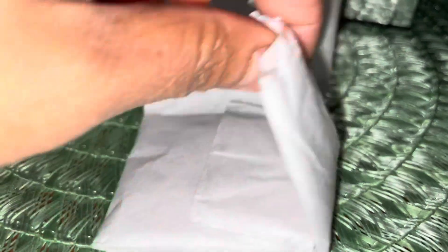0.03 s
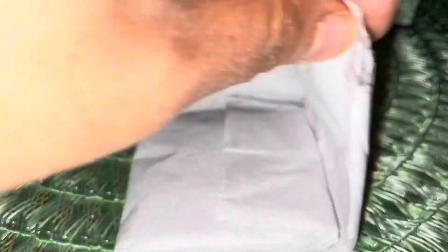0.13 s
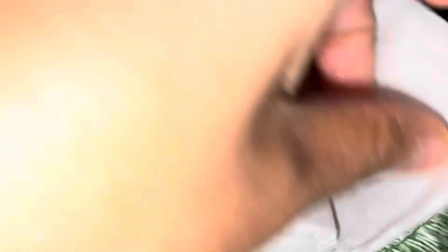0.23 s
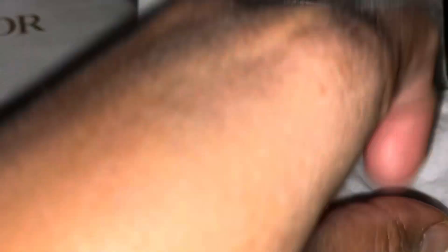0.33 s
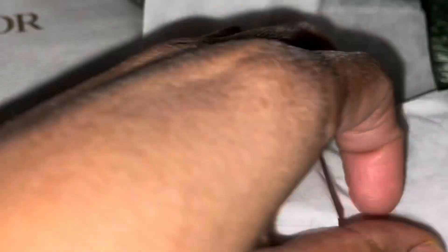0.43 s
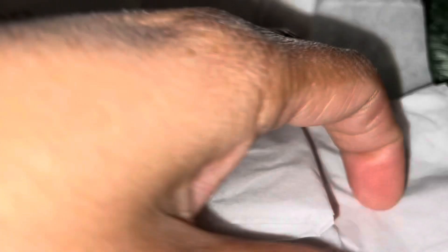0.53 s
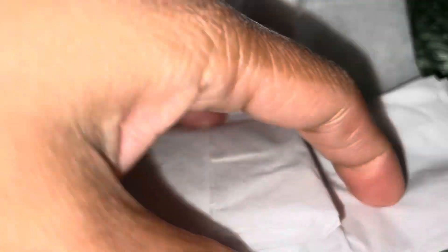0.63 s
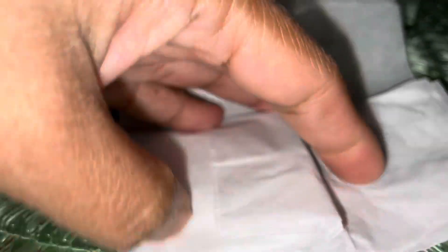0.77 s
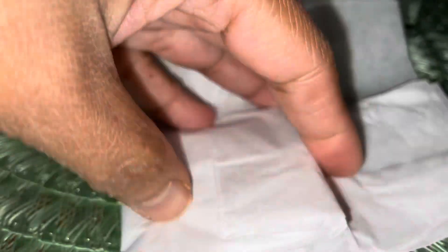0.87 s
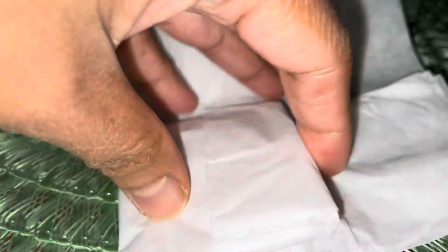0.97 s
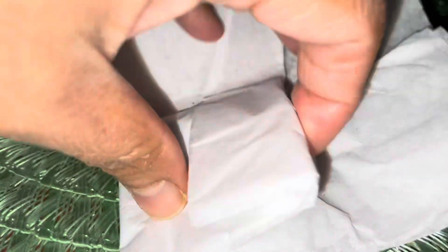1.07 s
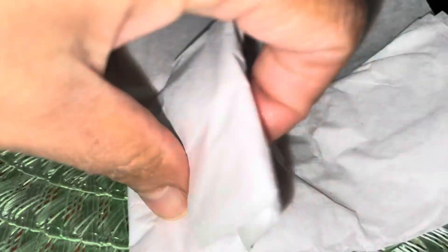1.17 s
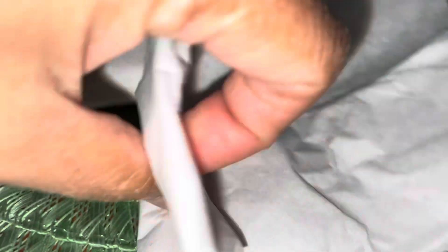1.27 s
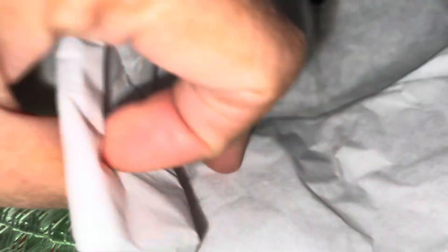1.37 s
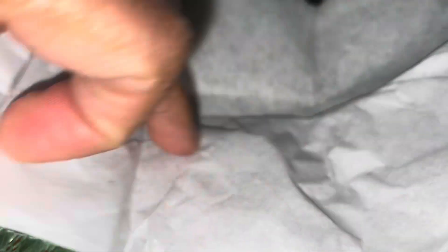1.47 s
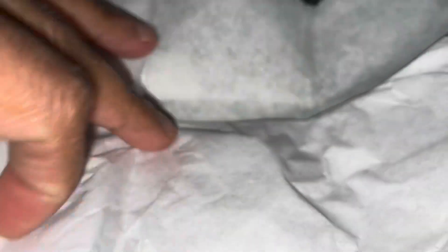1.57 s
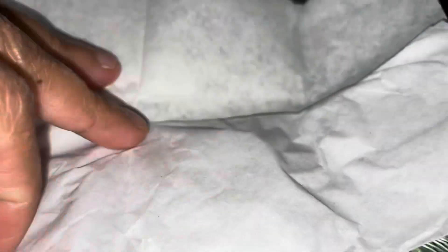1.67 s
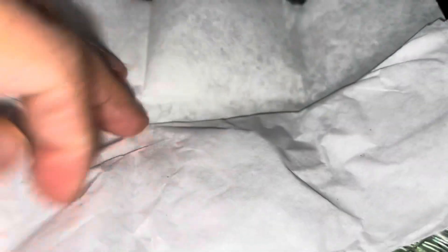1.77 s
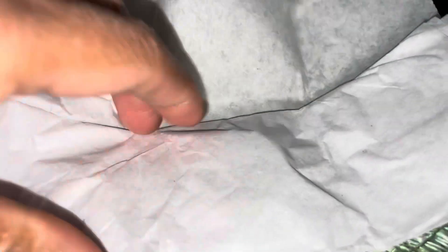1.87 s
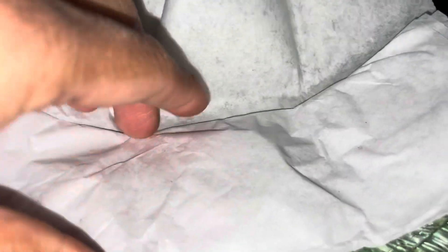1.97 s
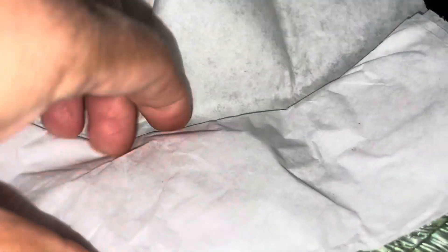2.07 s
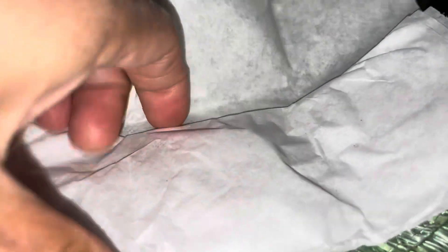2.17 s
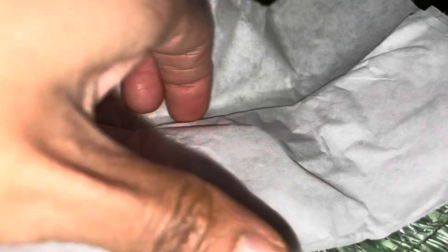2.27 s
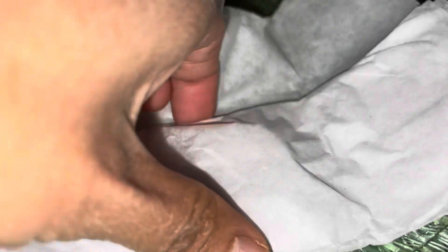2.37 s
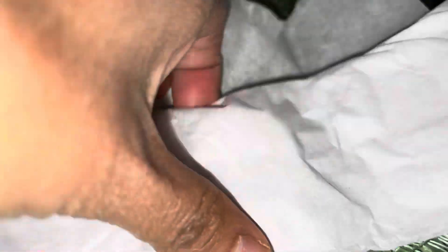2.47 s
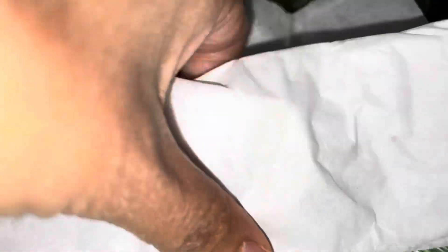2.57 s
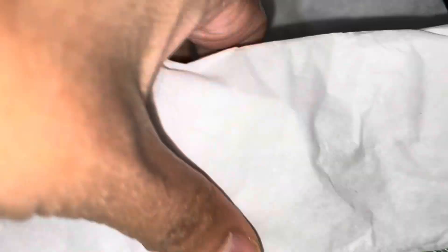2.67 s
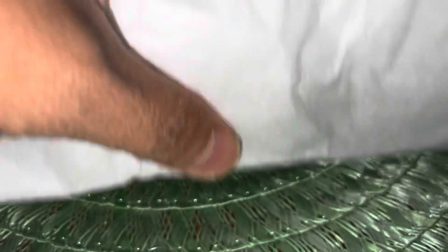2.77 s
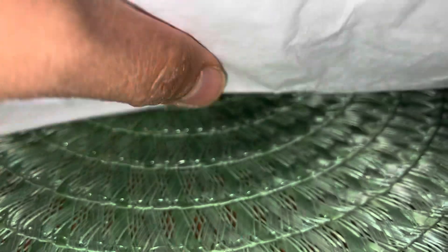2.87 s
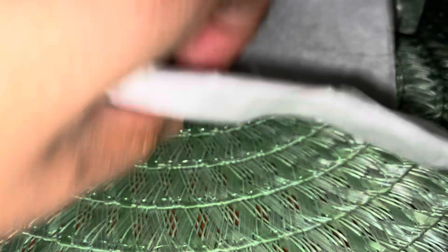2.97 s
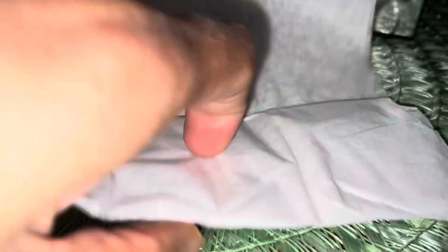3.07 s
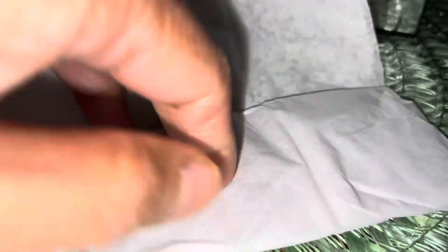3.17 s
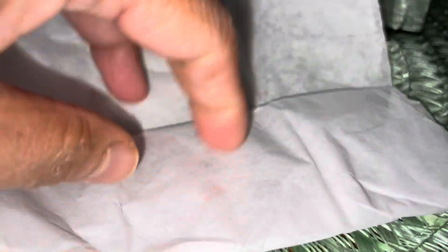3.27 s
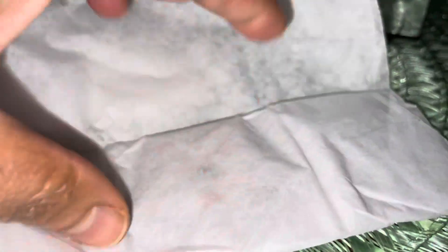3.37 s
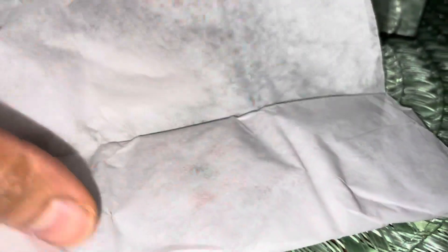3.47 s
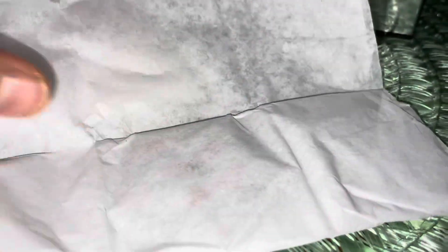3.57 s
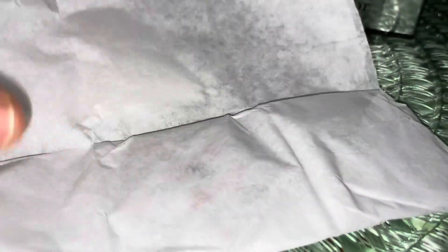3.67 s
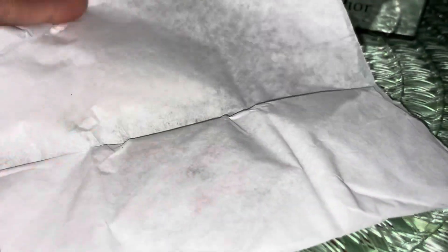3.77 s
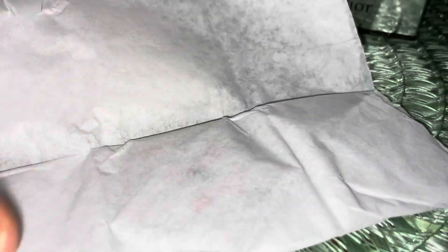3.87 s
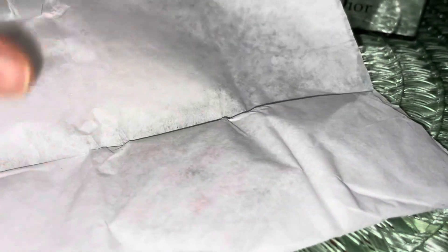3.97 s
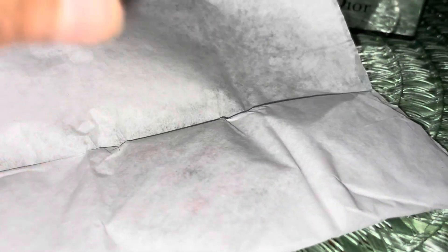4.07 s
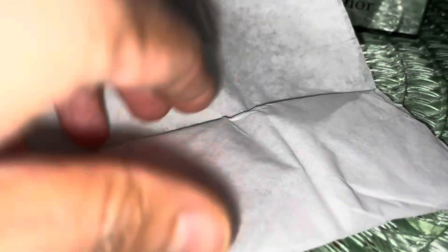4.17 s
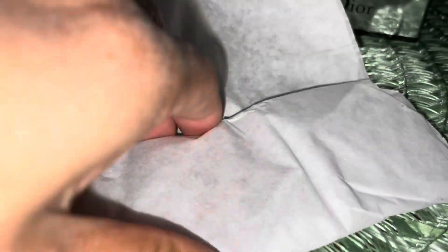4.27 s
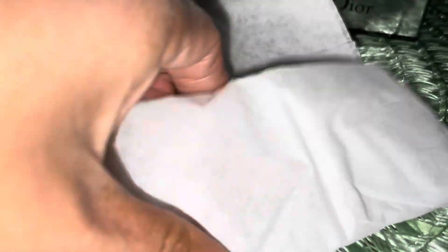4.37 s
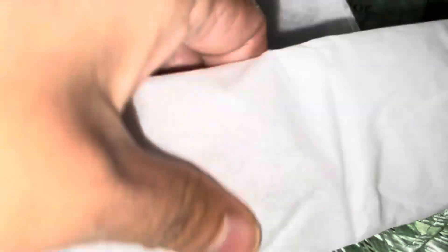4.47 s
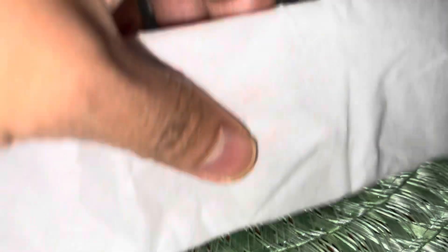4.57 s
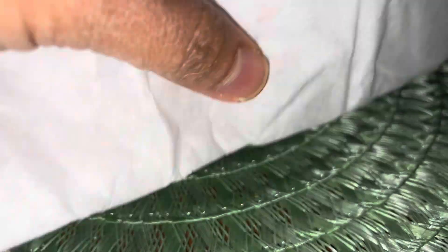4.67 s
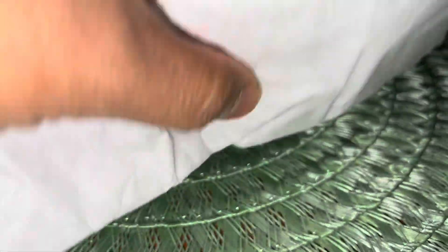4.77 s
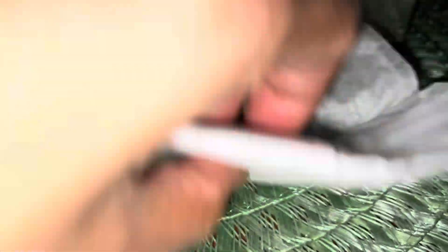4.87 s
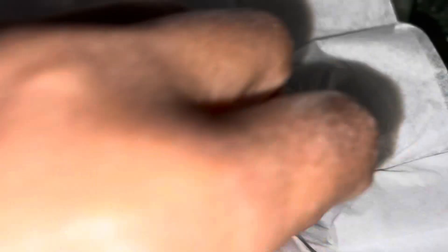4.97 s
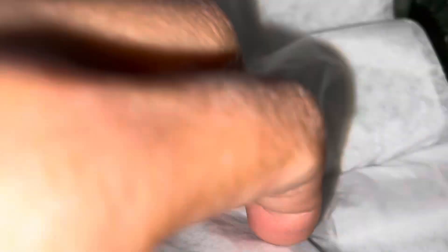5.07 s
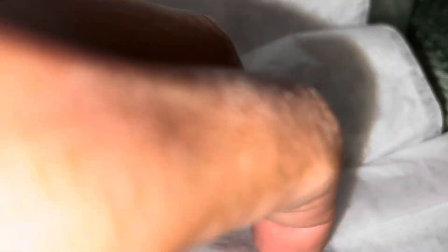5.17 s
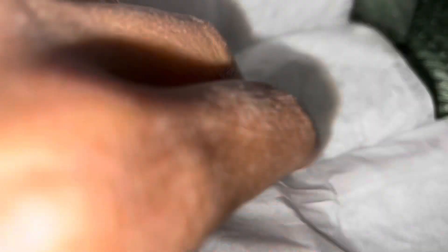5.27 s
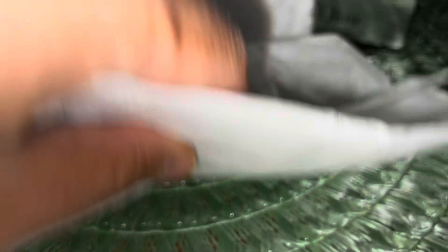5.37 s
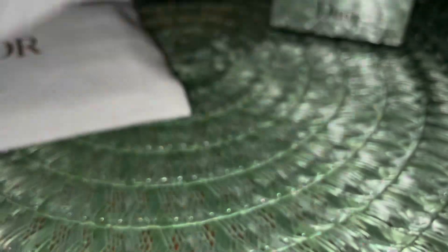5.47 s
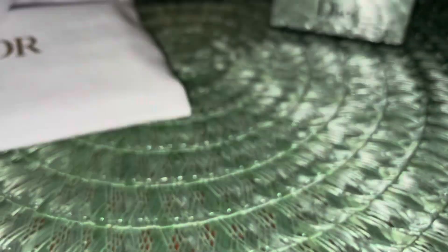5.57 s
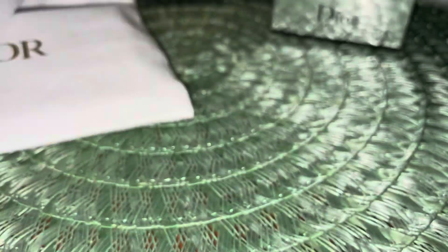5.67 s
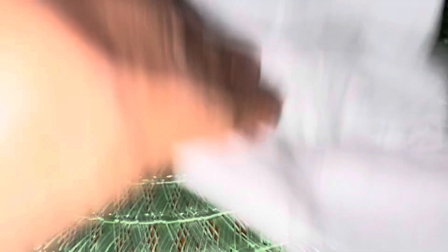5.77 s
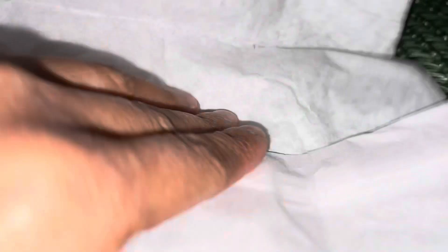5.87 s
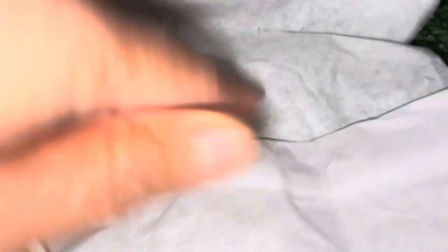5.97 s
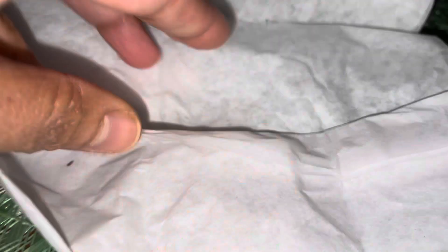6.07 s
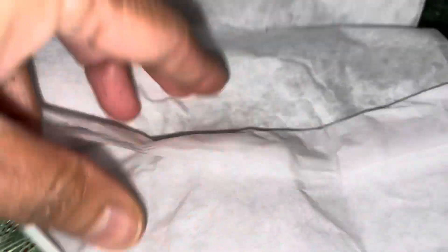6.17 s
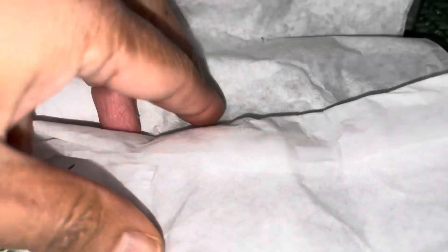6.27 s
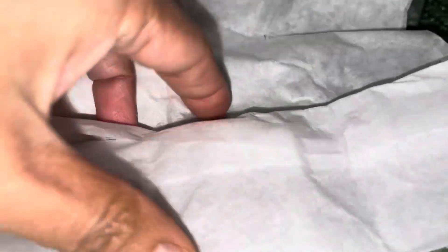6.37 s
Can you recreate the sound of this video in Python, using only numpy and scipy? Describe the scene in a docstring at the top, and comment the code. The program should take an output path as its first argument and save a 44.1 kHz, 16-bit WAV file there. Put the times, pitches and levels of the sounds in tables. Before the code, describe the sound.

Close, crisp crinkling of tissue paper being opened out by hand indoors. Fingers slide over the sheet with a dry hiss while creases tick and snap irregularly. Around the middle the paper flaps with a cluster of hollow pops and a low push of air on the nearby microphone. After a very short pause with only faint room tone, the rustling returns busier, with more snaps and a few soft thumps.

```python
"""A quiet room, a two-port microphone close to a woven mat where hands unfold thin tissue paper.
Fibres rub and tiny creases crackle; larger creases snap; whole panels buckle with a dull falling pop,
and the flapping sheet pushes air at the microphone. Just after four seconds the hands rest,
leaving the faint low rumble of the room."""
import sys
import numpy as np
from scipy import signal
from scipy.fft import rfft, irfft, next_fast_len
from scipy.io import wavfile
from scipy.ndimage import uniform_filter1d

SR = 44100
rng = np.random.default_rng(int(sys.argv[2]) if len(sys.argv) > 2 else 0)


def unload_audio(sound):
    """Save the sound as a 16-bit wav file, at the path given as the first command line argument."""
    columns = np.transpose(np.atleast_2d(sound))
    # keep every value between -1 and 1, then stretch to whole-number steps
    steps = np.round(np.clip(columns, -1, 1) * 32767)
    wavfile.write(sys.argv[1], SR, steps.astype(np.int16))


N = 282674

# Spectrum of crackling tissue, close up: frequency_hz, level_db
PAPER_SPECTRUM = [(500, -10), (1200, -2), (1750, -4), (2300, 0), (3200, -2), (4200, -1.5), (5000, -2.5),
                  (6000, 0.1), (8000, -2.5), (10000, -4), (12200, -12), (13500, -13), (15600, -8)]


def amp(db):
    """Decibels to gain."""
    return 10 ** (np.asarray(db) / 20)


def unit_rms(x):
    """Scales to rms 1."""
    return x / np.sqrt(np.mean(x ** 2) + 1e-20)


def at_hz(table, hz, column=1):
    """One column of a table, read on a log-frequency axis."""
    columns = np.transpose(table)
    return np.interp(np.log(hz + 1), np.log(columns[0] + 1), columns[column])


def at_time(table, t=None, column=1):
    """One column of a table, read at every sample unless times are given."""
    columns = np.transpose(table)
    return np.interp(np.arange(N) / SR if t is None else t, columns[0], columns[column])


def filtered(x, response):
    """Applies a complex frequency response given as a function of Hz."""
    size = next_fast_len(len(x) + 4096)
    return irfft(rfft(x, size) * response(np.fft.rfftfreq(size, 1 / SR)), size)[:len(x)]


def coloured(x, spectrum):
    """Shapes x by a spectrum table, at rms 1."""
    return unit_rms(filtered(x, lambda hz: amp(at_hz(spectrum, hz))))


def add(mix, start_s, sound):
    """Mixes a sound in at start_s."""
    part = mix[max(round(start_s * SR), 0):][:len(sound)]
    part += sound[:len(part)]


def wander(seconds):
    """Smooth random drift of rms 1."""
    width = max(round(seconds * SR), 2)
    return unit_rms(uniform_filter1d(uniform_filter1d(rng.standard_normal(N), width), width))


def grains(low_hz, high_hz, per_s, spread_db, cycles, clump_db, fall, pitches=24):
    """Clumped random trains of short wavelets that fall in pitch; a few are large."""
    out, clumps = np.zeros(N), amp(clump_db * wander(.012))
    for hz in np.geomspace(low_hz, high_hz, pitches):
        size = amp(spread_db * np.minimum(rng.exponential(1, N), 5)) * rng.choice([-1, 1], N)
        u = np.arange(0, 6 * cycles, hz / SR)  # time in cycles
        wavelet = u * np.exp(-2 * u / cycles) * np.sin(2 * np.pi * u / (1 + fall * u) ** .5)
        train = size * (rng.random(N) < per_s / pitches / SR * clumps)
        out += signal.oaconvolve(train, wavelet * hz / np.linalg.norm(wavelet) / high_hz)[:N]
    return unit_rms(out)


def swells(events, rest_db, stops=(), stop_ms=10, restart_ms=3):
    """Rows of time_s, level_db: events that rise and fall add in power, and stops hush them."""
    ms = np.arange(0, N / SR * 1000 + 20)
    power = np.zeros(len(ms))
    for peak_s, db, rise, fall in events:
        late_ms = ms - peak_s * 1000
        u = np.where(late_ms < 0, -late_ms / max(rise, 1), late_ms / max(fall, 1))
        power += amp(2 * np.maximum(db - 10 * (u + 0.066 * u ** 3), -200))  # tails fall ever faster
    for start_s, end_s, drop_db in stops:
        still = np.minimum((ms - start_s * 1000) / stop_ms, (end_s * 1000 - ms) / restart_ms)
        power *= amp(-2 * drop_db * np.clip(still + .5, 0, 1))
    return np.transpose([ms / 1000, 10 * np.log10(power + amp(2 * rest_db))])


def room_rumble():
    """Room tone: faint low noise whose level wavers."""
    # Spectrum of the room: frequency_hz, level_db
    spectrum = [(18, -48), (30, -24), (50, 1), (113, -2), (258, -7), (322, -9.5), (351, -3), (781, -47.5),
                (1660, -62), (6000, -67), (7800, -99), (13200, -120)]
    # Its slow swell: time_s, level_db
    levels = [(0, -44), (1.4, -45), (2.5, -39.5), (4.1, -38), (5.3, -35.5), (6.41, -43)]
    noise = rng.standard_normal(N) * amp(2.4 * wander(0.074))
    return amp(at_time(levels)) * coloured(noise, spectrum)


def finger_rubbing():
    """How hard the fingers rub the sheet, as rows of time_s, level_db."""
    # Pulls of the fingers: peak_s, level_db, rise_ms, fall_ms (each over about the top 10 dB)
    strokes = [(.01, -45.5, 23, 57), (.10, -39.5, 51, 90), (.30, -28, 60, 61), (.34, -26.5, 38, 53.5),
               (.428, -24.5, 47, 69), (.51, -33.5, 60, 38), (.60, -38, 148, 215), (.78, -29, 70, 180),
               (1.0, -32.5, 27, 150), (1.085, -30, 22, 19), (1.115, -39, 12, 30), (1.153, -26, 43, 13),
               (1.19, -41, 27, 43), (1.32, -31, 163, 132), (1.49, -28.5, 28, 208), (1.63, -30.5, 160, 78),
               (1.81, -24.5, 44.5, 154), (2.05, -27, 42, 14), (2.10, -25, 36, 156), (2.31, -28, 57.5, 11),
               (2.40, -28, 61, 25), (2.50, -27.5, 101, 69), (2.597, -22, 68, 20), (2.63, -26.5, 24.5, 23.5),
               (2.70, -27.5, 75.5, 92), (2.77, -25.5, 83, 31), (2.87, -31, 50, 52), (2.945, -27, 55, 34),
               (3.02, -16, 24, 25), (3.048, -21.5, 17, 10), (3.12, -24.5, 118, 100), (3.27, -38, 4, 43),
               (3.37, -27, 26, 33), (3.46, -28, 12.5, 4), (3.56, -35.5, 93, 86), (3.62, -25, 32, 33),
               (3.76, -21, 71, 41), (3.82, -29, 30, 57), (3.92, -48, 30, 4), (3.95, -50, 60, 88),
               (4.012, -37, 11, 7.5), (4.21, -17, 11, 64), (4.33, -22.5, 26, 47), (4.405, -22, 64, 20),
               (4.45, -26.5, 32, 41), (4.51, -21.5, 47, 46), (4.57, -20.5, 49, 29), (4.66, -22.5, 88.5, 16),
               (4.70, -21, 27, 34.5), (4.77, -24.5, 37, 46), (4.825, -23, 25, 51.5), (4.91, -22.5, 32, 105),
               (5.0, -28.5, 204, 114), (5.11, -21.5, 72, 57.5), (5.23, -31.5, 29, 150),
               (5.285, -25, 46.5, 34), (5.362, -22, 43, 35), (5.43, -32, 40, 29.5), (5.50, -31.5, 145, 85),
               (5.66, -35, 204, 50), (5.74, -22, 14.5, 15.5), (5.83, -20, 42.5, 135), (6.09, -35.5, 98, 32),
               (6.225, -17.5, 24.5, 32), (6.33, -30, 104, 125), (6.40, -32.5, 60, 52)]
    # The hands stop and still the sheet: start_s, end_s, drop_db
    stops = [(1.215, 1.24, 4.5), (2.325, 2.352, 3.5), (3.932, 3.938, 8), (3.968, 3.981, 10),
             (3.992, 4.001, 12), (4.068, 4.203, 22), (4.85, 4.885, 1.5), (5.17, 5.21, 4), (6.12, 6.168, 0)]
    return swells(strokes, rest_db=-70, stops=stops)


def rustle(rubbing):
    """Sliding fibres hiss in gusts under tiny crackling creases; grip and hand shape move the colour."""
    # Resonance of the hollow between hand and sheet: time_s, centre_hz, lift_db
    hollow = [(0, 5270, 0.5), (.3, 2000, 2.5), (.5, 1890, 1.5), (.8, 3400, 3), (1.1, 3880, 2),
              (1.3, 3500, 2.5), (1.6, 4370, 3), (1.85, 3800, 2.5), (2.2, 4840, 1), (2.7, 3860, -2),
              (3.05, 4300, 1), (3.45, 3470, 2), (3.75, 4650, 0.5), (4.4, 5130, 2.5), (5.1, 3040, 5),
              (5.35, 3140, 5), (5.75, 4100, 2.5), (6.41, 4150, 1.5)]
    # An echo off the near hand cancels one band: time_s, centre_hz, depth_db, width_octaves
    echo = [(0, 3400, 4, 0.31), (.3, 3400, 11, 0.22), (.45, 3280, 18, 0.17), (.65, 3200, 4, 0.48),
            (.8, 6000, 4, 0.18), (1.0, 1760, -1, .2), (1.55, 1600, 9, 0.16), (2.0, 1680, 2, 0.14),
            (3.1, 1870, -2, 0.18), (3.3, 1720, 19, 0.23), (4.0, 1620, -2, .15), (4.4, 3920, 5.5, 0.3),
            (5.3, 5200, 3.5, 0.65), (5.55, 1790, 7, 0.19), (6.41, 1800, 0, .15)]
    hiss = rng.standard_normal(N) * amp(2.0 * wander(0.0063) + 2.9 * wander(0.00074))
    crackle = grains(1216, 15500, per_s=3000, spread_db=2.0, cycles=0.98, clump_db=4.0, fall=0.0092)
    # Stiffer facets ring for a few cycles.
    ticks = grains(1048, 9000, per_s=900, spread_db=2.5, cycles=2.4, clump_db=4.5, fall=0.007, pitches=12)
    paper = coloured(0.58 * unit_rms(hiss) + 0.61 * crackle + 0.3 * ticks, PAPER_SPECTRUM)
    hz, t, frames = signal.stft(paper, SR, nperseg=256)
    octaves = np.log2(np.clip(hz, 1200, None))[:, None]

    def band_db(table, width_octaves):
        offset = octaves - np.log2(at_time(table, t))
        return at_time(table, t, column=2) * np.exp(-(offset / width_octaves) ** 2)

    db_per_octave = -0.99 + 0.066 * (at_time(rubbing, t) + 30)  # gentler rubbing is duller
    tilt_db = (octaves - np.log2(5000)) * db_per_octave
    hollow_db = band_db(hollow, width_octaves=0.46)
    echo_db = -band_db(echo, np.maximum(at_time(echo, t, column=3), .05))
    # Different folds sound at different moments.
    folds = uniform_filter1d(uniform_filter1d(rng.standard_normal(frames.T.shape), 24, 0), 8, 1).T
    frames *= amp(tilt_db + hollow_db + echo_db + 2.28 * unit_rms(folds))
    return amp(at_time(rubbing) + 2.5) * signal.istft(frames, SR, nperseg=256)[1][:N]


def random_creases(rubbing, count=220, over_rubbing_db=13):
    """Rows for crease_snaps: further creases give way at random times, as loud as the rubbing allows."""
    when, extra_db, tilt, length = rng.random((count, 4)).T
    start_s = when * N / SR
    level_db = at_time(rubbing, start_s) + over_rubbing_db + extra_db
    return list(zip(start_s, level_db, 2.5 + 14.0 * (tilt - .5), 0.21 * (.5 + length)))


def crease_snaps(rubbing, ring_hz=4900, ring_octaves=0.14):
    """A crease lets go in a burst of a few milliseconds and rings briefly, higher when brighter."""
    # Creases at set times: start_s, level_db, tilt_db_per_octave, length_ms
    set_creases = [(0.012, -14.5, 3, 0.57), (0.0205, -13.5, 2, 0.37), (0.175, -13, 7, 0.41),
                   (0.1947, -18, 4, 0.87), (0.26, -14.5, 15, 1.5), (0.323, -9.5, -16, 0.73),
                   (0.351, -21, 0, 0.65), (0.3665, -22, 3, 0.44), (0.376, -28, -5, .6),
                   (0.404, -14, -2, 0.88), (0.425, -7.5, 2, 2.2), (0.441, -17, -13, 0.88),
                   (0.478, -12, -12, 0.46), (0.541, -21, 9, .5), (0.549, -19.5, -4, 0.5),
                   (0.604, -11, 16, 0.5), (0.629, -22, -3, .5), (0.7667, -10, 9, 0.43),
                   (0.7748, -7, 0, .8), (0.782, -9, 2, 0.56), (0.7931, -3, 6.5, 0.41),
                   (0.821, -22, 0, 0.94), (0.834, -17, 12, .5), (0.854, -19, 7, 0.55),
                   (0.873, -19, 13, .6), (0.987, -11.5, 9, 0.58), (1.0621, -4, 9, 0.51),
                   (1.109, -15, 4, 1.5), (1.116, -12.5, -1.5, 0.77), (1.178, -16, 8, .5),
                   (1.187, -11, 3, 0.91), (1.197, -10, 2, 0.53), (1.206, -10, 1.5, 0.76),
                   (1.2155, -14, 2, .5), (1.226, -15, 6, 0.37), (1.233, -22, -6, .4),
                   (1.2467, -10, 6, 2.2), (1.2552, -9, 6, 0.51), (1.277, -15.5, -2, 1.1),
                   (1.307, -15, -14, 0.89), (1.359, -32, -1, 0.54), (1.3772, -11, 1, .4),
                   (1.441, -11, -3, 0.16), (1.484, -15, -6, 1), (1.4922, -9, -1, 0.89),
                   (1.534, -21, 0, 0.45), (1.619, -10, -3, 0.89), (1.6654, -7, 10, 1.1),
                   (1.7288, -11.5, 7, 0.93), (1.825, -14, -8, 0.51), (1.8558, -7, -6, .5),
                   (1.886, -8, -10, 0.4), (1.8987, -11, -7, 0.48), (1.9155, -25, 7, 0.64),
                   (1.934, -13.5, -17, 0.39), (1.984, -7.5, -2, 0.62), (2.028, -17, -6, .6),
                   (2.0459, -4.5, 2, 1.6), (2.074, -12, 8, 0.54), (2.108, -5.5, 0, .7),
                   (2.154, -27, 2, 0.51), (2.1855, -13, 5, 0.67), (2.2313, -6, 5, 0.59),
                   (2.3166, -8.5, -0.5, 1.4), (2.337, -13, -5, 0.65), (2.356, -10.5, -2.5, 2.7),
                   (2.399, 2.5, 7, 0.34), (2.4068, -1, 8, 0.24), (2.414, -15, 26, .6),
                   (2.439, -9, 0.5, 0.89), (2.479, -9, 10, .5), (2.502, -11, 4, 1.2),
                   (2.537, -10, 12, 1.4), (2.554, -10, -4, 0.82), (2.5193, -6.5, 1, 2.4),
                   (2.833, -10, 5, 0.69), (2.8584, -10, 6, 0.54), (2.852, -10, 12, 0.55),
                   (2.8768, -10, 9, 0.63), (2.882, -8, 8, 0.53), (2.936, -23, -1, .6), (2.98, -15, 7, .6),
                   (3.015, -3, 21, 1.6), (3.024, -15, -14, 1.3), (3.2727, -12, 6, 0.55),
                   (3.3, -15, 2, 1.2), (3.4565, -8.5, 10, 0.87), (3.529, -14, 0.5, 0.6),
                   (3.5522, -15, -3, 0.37), (3.5588, -13, 2, 0.86), (3.596, -13, 4, 0.95),
                   (3.6205, 0.5, 2.5, 0.41), (3.624, -11, 1, .6), (3.679, -12, -1, 2),
                   (3.724, -5, -2, 0.76), (3.7609, 4, 0.5, 0.65), (3.781, -8, -10, 1.2),
                   (3.825, -10, 1, 0.79), (3.8461, -13, -2, 0.79), (3.879, -12.5, 2, 1.5),
                   (3.9132, -17, 5, .7), (3.919, -23, -4, 0.66), (3.94, -13, 4, 0.67),
                   (3.947, -21, -7, 1.4), (3.956, -21, 4, .6), (3.9617, -32, -5.5, .7),
                   (3.9825, -12, 1, 0.37), (4.01, -24, 3, 0.46), (4.03, -21, 0.5, 0.46),
                   (4.033, -22, 3, 1.5), (4.0471, -29.5, -4, 1.5), (4.1626, -33.5, -12, 1),
                   (4.213, -22, -2, 8), (4.236, -4, 1, 0.85), (4.309, -3.5, 2, 0.68),
                   (4.303, -10, 2, 0.66), (4.324, -6, 2, 0.67), (4.3282, -6, -1, 1.3),
                   (4.371, 1, 5.5, 0.43), (4.387, -0.5, 10, .6), (4.4544, -4, 11, 0.87),
                   (4.49, -10, 6, 0.65), (4.516, -11, 10, 0.58), (4.523, -14, -10, 3),
                   (4.563, -2, 4, 0.95), (4.5715, -4, -4, 0.45), (4.6276, -6.5, -3, 0.33),
                   (4.65, 7, 12, 0.31), (4.658, -2, 6.5, 0.65), (4.749, -9, 5, 0.72),
                   (4.761, -10, -2, 1.2), (4.778, -9, 6, .6), (4.796, -3, 2, 0.93), (4.821, -9, 1, 1.3),
                   (4.85, -3.5, 0.5, 1.1), (4.8996, -6.5, -7, 1.2), (4.906, -19, 4, 0.62),
                   (4.977, -7, -21, 0.53), (5.0232, -12, -2, .5), (5.12, -9, -24, 1.7),
                   (5.248, -19, 0, 0.37), (5.276, -22, 5, 3), (5.294, -11, -9, 0.51),
                   (5.3262, -6.5, 13, 0.5), (5.381, -3, 14, 0.63), (5.399, -15, 7, .6),
                   (5.409, -11, 6, 0.45), (5.429, -10.5, 7, 0.88), (5.458, -7, -1, 0.92),
                   (5.4758, -5, 0, 1.2), (5.515, -4.5, 1, 0.52), (5.526, -3.5, 2, 0.48),
                   (5.538, -9.5, -2, 0.63), (5.593, -29, 7, .5), (5.64, -14, 3, 0.54),
                   (5.664, -25, 7, .4), (5.673, -14.5, 3, 1.3), (5.725, -6, 8, 1.2),
                   (5.741, -6.5, -0.5, 2), (5.8186, -1, 5, 4.2), (5.8586, -8.5, -16, 0.53),
                   (6.069, -21, 4, 0.55), (6.081, -18, -12, 0.77), (6.102, -12.5, -3.5, 0.8),
                   (6.1715, -13, -0.5, 1.4), (6.184, -7, 3, 0.31), (6.2195, -13, 0, 0.67),
                   (6.2342, -15, -23, 1.5), (6.306, -13, -3, .6), (6.314, -14, 0, 0.5),
                   (6.335, -11, -8, 0.76), (6.3637, -4, -3, 0.61), (6.3858, -4.5, 2, 0.56),
                   (6.4065, -5, -1, 1.8)]
    out, ms = np.zeros(N), np.arange(1024) / SR * 1000
    hz = np.fft.rfftfreq(1024, 1 / SR)
    octaves = np.log2(np.clip(hz, 2200, 11000) / 5000)
    for start_s, level_db, tilt, length_ms in random_creases(rubbing) + set_creases:
        off_ring = np.log2(hz / ring_hz + 1e-9) - 0.027 * tilt
        ring_db = 5 * np.exp(-(off_ring / ring_octaves) ** 2)
        colour = amp(ring_db + at_hz(PAPER_SPECTRUM, hz) + tilt * octaves)
        noise = irfft(rfft(rng.standard_normal(1024)) * colour)
        u = ms / max(length_ms, .2)
        burst = noise * (1 - np.exp(-u / 0.15)) * np.exp(-u / 1.8)
        add(out, start_s - .0004, amp(level_db - 2.0) * burst / abs(burst).max())
    return out


def panel_pops():
    """Bending waves in paper carry the high pitches first, so each buckling panel falls in pitch."""
    # Panels flipping their curve: start_s, level_db, final_pitch_hz, extra_onset_cycles
    flips = [(0.135, -27, 95, .1), (0.343, -25, 266, 3.2), (0.4292, -8.5, 1190, 0.44),
             (0.478, -15, 900, 1.1), (0.699, -22.5, 590, 0.57), (0.7729, -9.5, 1430, 0.67),
             (1.247, -15, 1050, 0.78), (1.486, -20, 700, .4), (1.492, -17.5, 391, 0.87),
             (1.4985, -14.5, 800, 0.34), (1.524, -25, 500, 0.34), (1.534, -20, 700, .4),
             (1.552, -22, 450, 0.33), (1.5784, -24, 453, 0.51), (1.5896, -14, 553, .4),
             (1.594, -21, 96, 0.33), (1.601, -15, 800, .3), (1.61, -18.5, 700, .3),
             (1.6319, -13, 118, 1.48), (2.048, -16.5, 424, 1.07), (2.2003, -13.5, 446, 2.7),
             (2.5354, -12.5, 790, 1.1), (2.6033, -20, 273, 1.5), (3.014, -9, 980, 0.18),
             (3.036, -7.5, 104.5, 1.13), (3.0173, -8.5, 1010, 0.29), (3.052, -10.5, 1100, .2),
             (3.0714, 1, 1150, .02), (3.074, -13, 700, 0.22), (3.078, -11, 1150, 0.24),
             (3.0845, -5, 198, 0.68), (3.093, -23, 700, .3), (3.102, -6.5, 753, 0.24),
             (3.1045, -17, 420, .2), (3.109, -25, 500, 0.33), (3.0999, -3, 363, 0.25),
             (3.130, -7.5, 230, 0.64), (3.144, -19, 75, 0.23), (3.733, -15.5, 111, 0.22),
             (3.76, -14, 355, 0.89), (3.77, -20, 445, 0.24), (4.2128, -10, 465, 0.69),
             (4.2215, -11, 700, .4), (4.2252, -10, 457, 0.58), (4.3325, -18, 396, 1.9),
             (4.388, -10.5, 1100, 1.5), (4.4662, -11, 900, 1.6), (4.5212, -12, 370, 0.48),
             (4.555, -15.5, 580, 0.42), (4.705, -13, 84, 0.85), (4.7962, -14, 777, 0.54),
             (4.8228, -14.5, 416, 0.92), (4.8343, -11, 1010, 0.51), (4.939, -16, 330, 1.8),
             (5.0136, -9, 505, 1.4), (5.0231, 1, 331, 2.17), (5.0345, -5.5, 330, .1),
             (5.0554, -15, 348, 0.26), (5.0603, 2, 337, 1.6), (5.1107, -18, 497, 1.6),
             (5.3578, -12, 577, 1.1), (5.48, -13, 77, .2), (5.8172, -3.5, 167, 1.21),
             (5.828, -16, 69.5, 0.32), (5.844, -5, 267, 1.58), (5.8425, -11, 820, .2),
             (5.8525, -2, 560, .3), (5.8578, -2, 760, .3), (5.8605, -15, 420, .3), (5.8716, -6, 310, 0.098),
             (5.8778, -10, 800, .5), (5.888, -12, 700, .3), (5.908, -17, 1000, .3),
             (5.992, -16.5, 62, 0.26), (6.229, -27, 450, 0.49)]
    out = np.zeros(N)
    for start_s, level_db, pitch_hz, extra_cycles in flips:
        u = np.arange(0, 8, pitch_hz / SR)  # time in cycles of the final pitch
        turns = u + extra_cycles * (1 - np.exp(-u / 0.29))
        envelope = (1 - np.exp(-(u / 0.18) ** 2)) * np.exp(-u / 1.29)
        add(out, start_s - .0004, amp(level_db) * envelope * np.sin(2 * np.pi * turns))
    return out


def sheet_flaps(rubbing, rise_share=0.43, flex_slower=2.03):
    """The sheet flexes with small flips and a low rub, and pushes air; panels settle slower than air."""
    # Flaps of the whole sheet: peak_s, air_db, flex_db, air_fall_ms (over about the top 10 dB)
    flaps = [(0.14, -31.5, -41.5, 11), (.34, -30.5, -30, 17), (.435, -67, -39.5, 40), (.82, -43, -67, 45),
             (1.36, -40, -47, 48), (1.50, -29.5, -36, 31), (1.58, -31.5, -39, 36),
             (1.638, -32.5, -32.5, 35), (1.84, -38, -34.5, 140), (2.05, -34, -33.5, 19),
             (2.19, -38.5, -33, 137), (2.45, -38, -36.5, 62), (2.55, -54, -33, 50),
             (2.618, -27.5, -35.5, 24), (2.77, -50, -56, 30), (2.84, -38.5, -39, 104), (3.04, -19, -21, 36),
             (3.10, -23, -28, 54), (3.43, -32, -46, 51), (3.56, -33, -37, 51), (3.66, -30.5, -37, 57),
             (3.73, -25.5, -30.5, 97), (3.87, -44, -53.5, 43), (4.226, -18.5, -18, 7.5),
             (4.37, -37, -53, 67), (4.53, -29, -38.5, 86), (4.71, -26, -33, 60), (4.91, -28.5, -29, 75),
             (5.14, -33, -30, 31), (5.07, -33, -26.5, 49), (5.30, -34, -33.5, 66), (5.48, -29, -30, 42),
             (5.843, -18.5, -18.5, 29), (5.951, -31, -28.5, 38), (5.998, -42, -49, 36),
             (6.191, -40, -36, 16), (6.30, -34.5, -35, 52), (6.388, -36, -31, 34)]
    # Spectrum of the flexing panels: frequency_hz, level_db
    flex_spectrum = [(120, -15), (250, 9), (400, 4), (800, 3), (1300, -1.5), (1800, -22), (3000, -46)]
    # Spectrum of air pushed at the microphone: frequency_hz, level_db
    air_spectrum = [(20, -46), (42, -6.5), (70, 7), (120, 3.5), (200, -4), (350, -21)]
    flips = grains(177, 1503, per_s=500, spread_db=1.5, cycles=1.63, clump_db=5.0, fall=0.083, pitches=12)
    flex = coloured(0.36 * flips + 0.86 * rng.standard_normal(N), flex_spectrum)
    air = coloured(rng.standard_normal(N) * amp(1.6 * wander(0.024)), air_spectrum)
    pushes = [(s, db, rise_share * ms, ms) for s, db, _, ms in flaps]
    bends = [(s, db, rise_share * flex_slower * ms, flex_slower * ms) for s, _, db, ms in flaps]
    push_db = at_time(swells(pushes, rest_db=-70)) + 2.9
    bend_db = at_time(swells(bends, rest_db=-58)) + 1.0
    rub_db = at_time(rubbing)  # both also follow the rubbing
    flex_gain = np.hypot(amp(bend_db), amp(rub_db - 8))
    air_gain = np.hypot(amp(push_db), amp(rub_db - 12.5))
    return flex * flex_gain + air * air_gain


def scattered(x):
    """The same sound by ever-changing paths off moving hands and folds: random phases in short frames."""
    frames = signal.stft(x, nperseg=128)[2]
    phases = np.exp(2j * np.pi * rng.random(frames.T.shape).T)
    return unit_rms(signal.istft(frames * phases, nperseg=128)[1][:N]) * np.std(x)


def right_port(left):
    """The right port hears the paper shaded, shifted in phase and partly by other paths."""
    # Left port against right: frequency_hz, left_louder_db, left_lead_rad, coherence (0-1)
    ports = [(60, 1.2, .2, .95), (350, 4.9, .5, .94), (1200, 8.5, .85, .87), (1800, 6, .1, .35),
             (2900, 2.5, .1, .45), (4300, 2.8, .1, .85), (5900, 7.5, -.3, .8), (6350, 8.3, -1.5, .45),
             (6750, .3, -3.15, .98), (8050, 0, -3.2, .98), (10300, 0, -6.2, .95), (12200, 0, -6.4, .95),
             (13300, 0, -9.3, .94), (15800, 0, -9.5, .93)]
    coherence = lambda hz: np.clip(at_hz(ports, hz, column=3), 0, 1)
    shade = lambda hz: amp(-at_hz(ports, hz)) * np.exp(-1j * at_hz(ports, hz, column=2))
    direct = filtered(left, lambda hz: coherence(hz) * shade(hz))
    indirect = filtered(scattered(left), lambda hz: np.sqrt(1 - coherence(hz) ** 2) * shade(hz))
    return direct + indirect


def scene():
    """The paper close up over the room tone, at the left and right ports."""
    rubbing = finger_rubbing()
    left = rustle(rubbing) + crease_snaps(rubbing) + panel_pops() + sheet_flaps(rubbing) + room_rumble()
    return amp(0.66) * np.array([left, right_port(left)])


def record(dry):
    """The loudest peaks clip, then the treble is cut above 15850 Hz."""
    lowpass = signal.firwin(511, 15850, window=("kaiser", 9), fs=SR)
    return signal.oaconvolve(np.clip(dry, -1, 1), lowpass[None], "same")


dry = scene()
out = record(dry)
unload_audio(out)
```